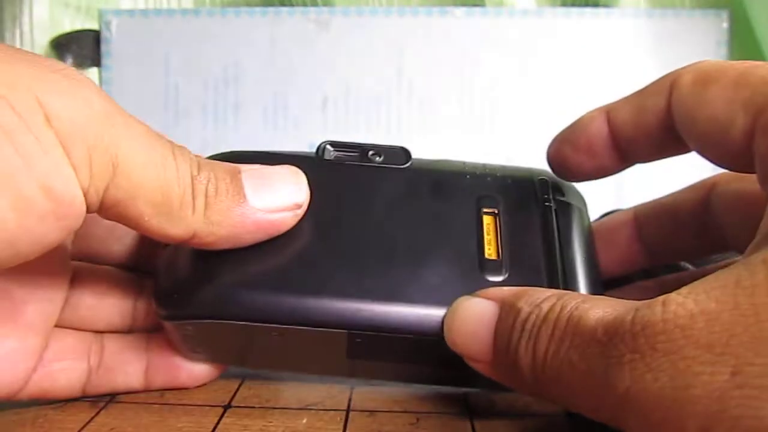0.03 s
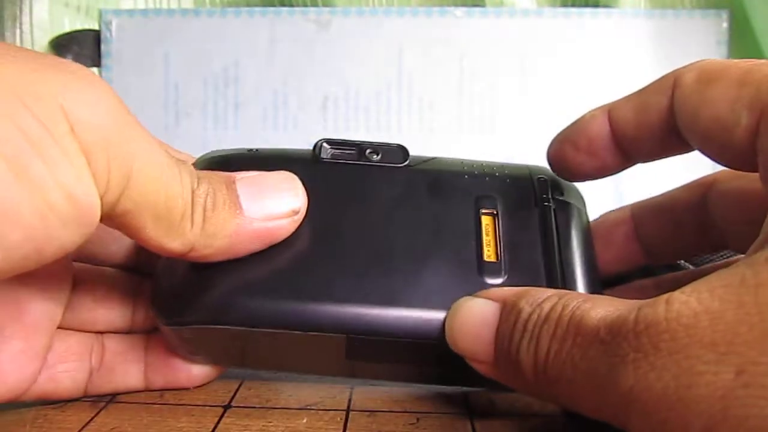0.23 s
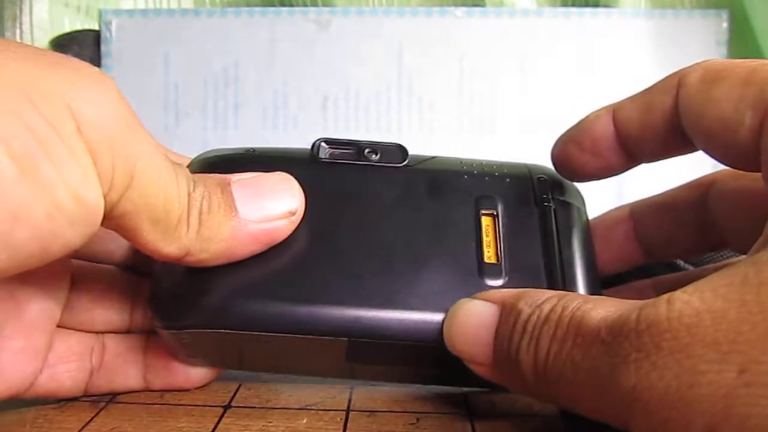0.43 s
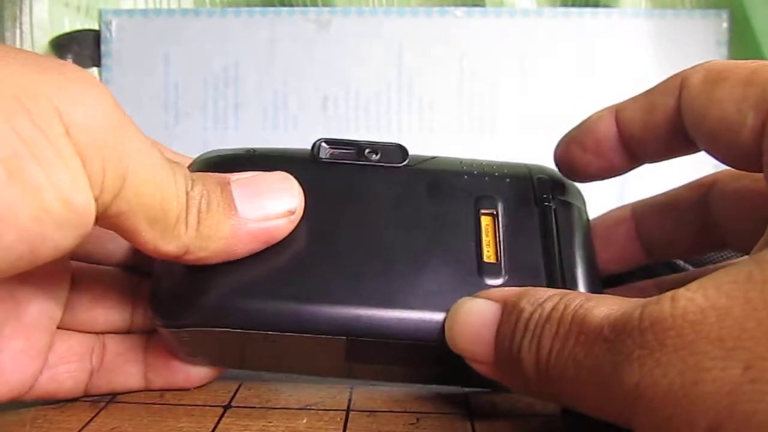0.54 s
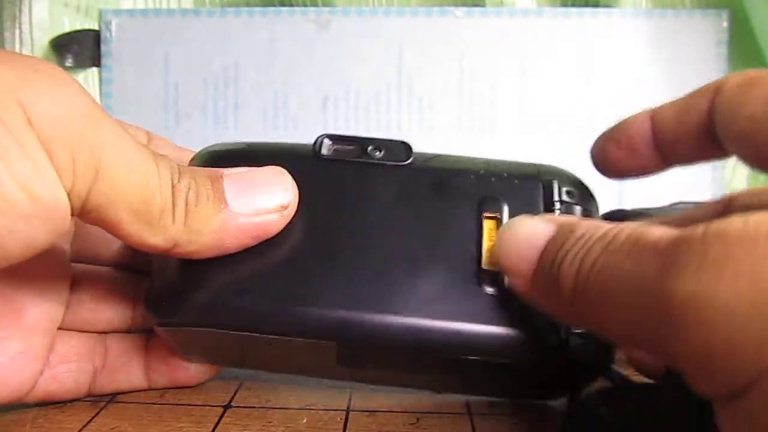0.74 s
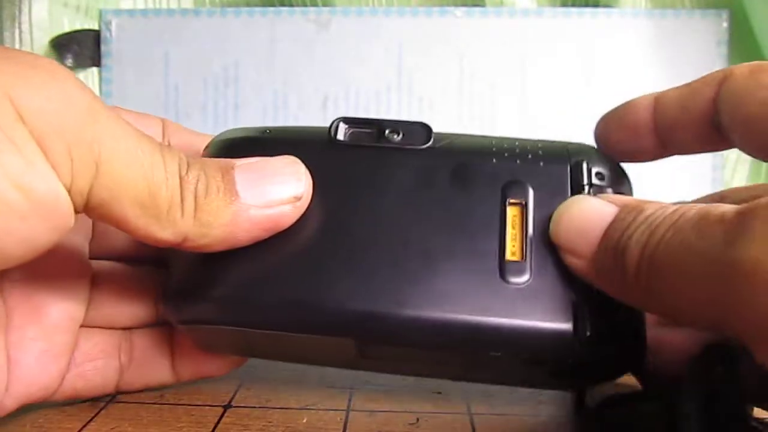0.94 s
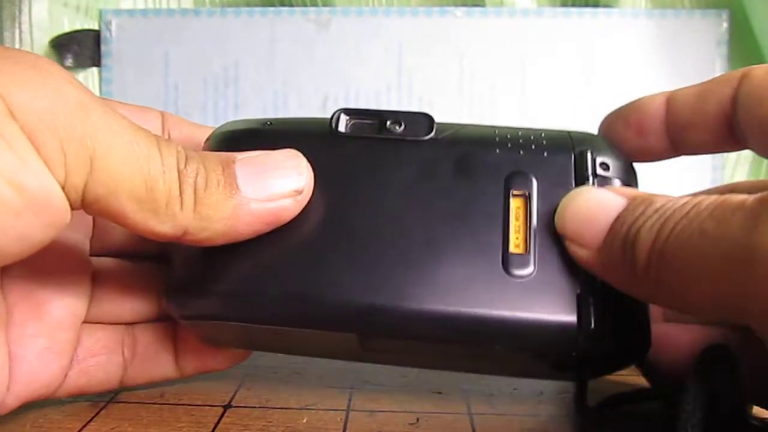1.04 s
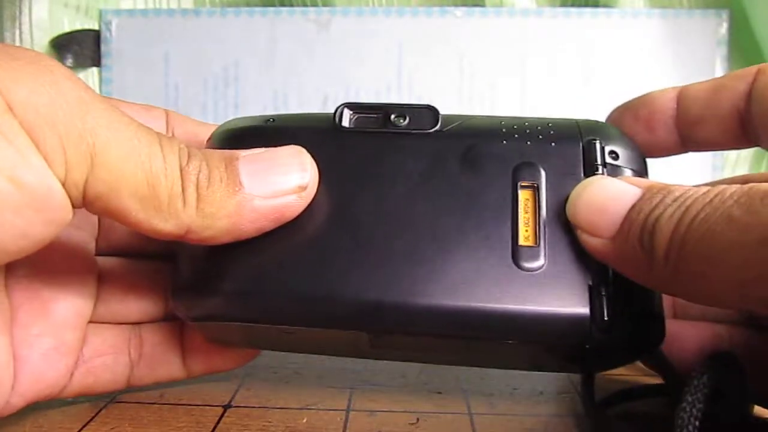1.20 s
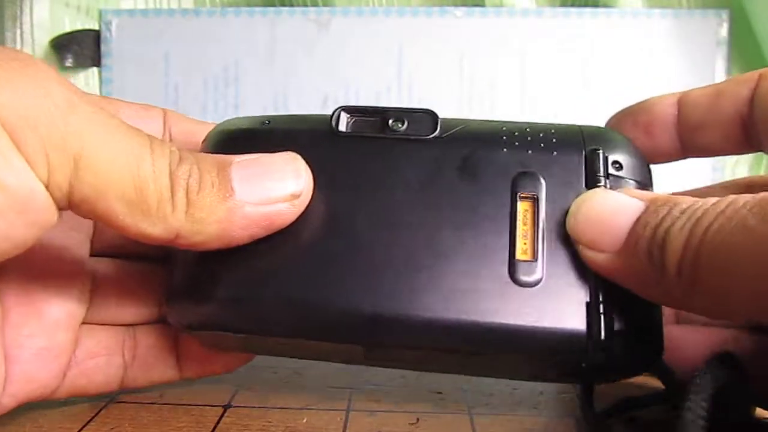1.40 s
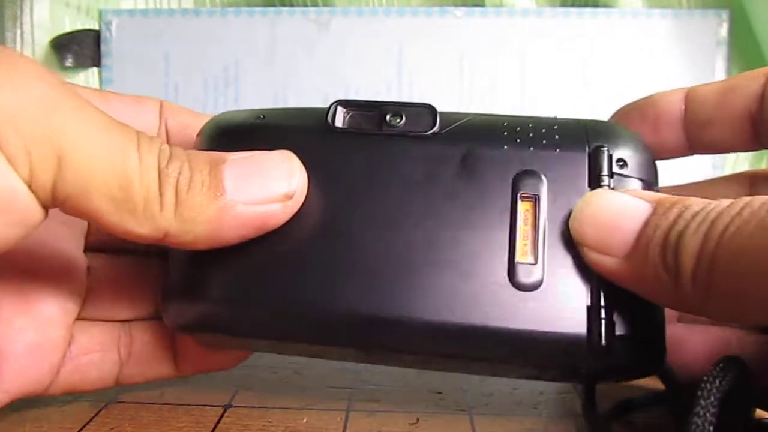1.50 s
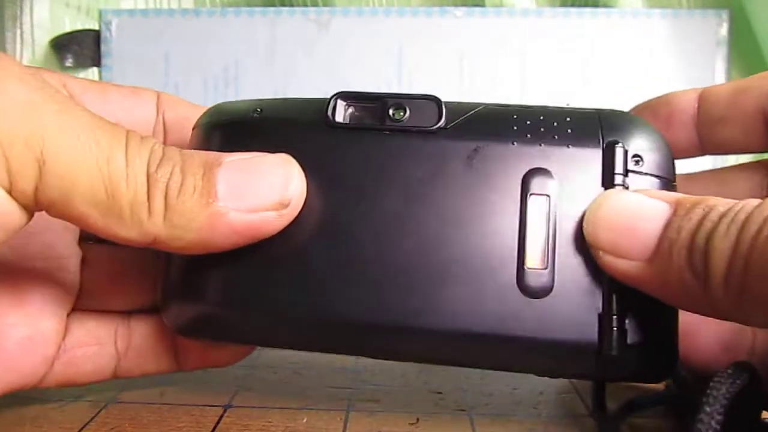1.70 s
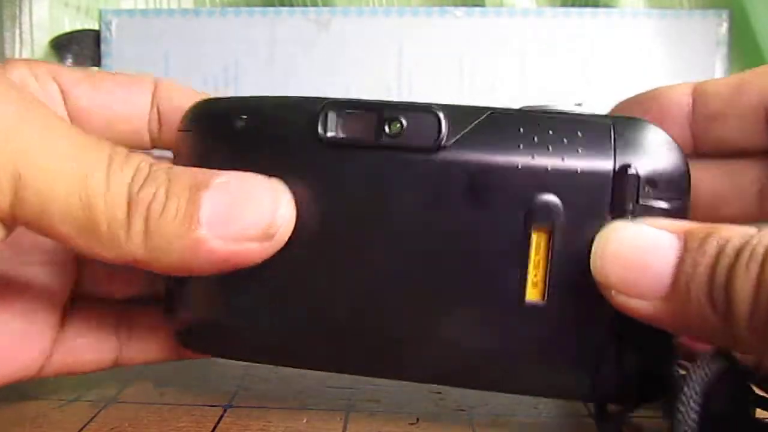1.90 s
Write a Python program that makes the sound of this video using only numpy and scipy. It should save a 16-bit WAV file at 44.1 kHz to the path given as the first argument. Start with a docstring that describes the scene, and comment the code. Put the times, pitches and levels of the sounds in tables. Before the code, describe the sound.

A compact film camera's plastic back ticks faintly, then snaps shut with a loud, sharp click at about 0.2 seconds. Fingers bump the shell softly near 0.4 and 0.7 seconds. From about 0.6 seconds a small motor winds the film, much quieter than the snap, whirring steadily with a high gear whine, hiss and light rattle until about 2 seconds. It is close, in a small room with faint steady noise.

```python
"""A film camera winds on

Close to the microphone, a compact camera's plastic back snaps shut and fingers bump the shell.
A small motor then winds the film: its little gear whines, a slower wheel hums, the brushes hiss
and the gears rattle. The snap makes the recorder turn itself down, and the level creeps back
while the motor runs. A small room adds a short echo and steady noise."""
import sys
import numpy as np
from scipy import signal
from scipy.fft import rfft, irfft, next_fast_len
from scipy.io import wavfile
from scipy.ndimage import uniform_filter1d, map_coordinates

SR = 44100
rng = np.random.default_rng(int(sys.argv[2]) if len(sys.argv) > 2 else 0)


def dump(signal):
    """Clip the signal to [-1, 1] and save it as 16-bit WAV at the path in sys.argv[1]."""
    limited = np.clip(np.atleast_2d(signal).T, -1, 1)
    pcm = np.round(limited * 32767).astype(np.int16)
    wavfile.write(sys.argv[1], SR, pcm)


N = 85995

# tone colour of the room's steady noise (f/Hz, level/dB)
AIR_COLOUR = [(20, -16), (58, -2.5), (85, -3.5), (140, 3.5), (260, 0), (430, 3), (700, -6), (1200, -6.5),
              (2400, -10), (3000, -17), (3900, -29.5), (5500, -22), (8000, -29), (11000, -38), (14000, -50),
              (16000, -84.5)]
# time the room's echo takes to fade by 60 dB (f/Hz, t/s)
ROOM_FADE = [(200, .25), (1200, 0.23), (3000, 0.35), (7000, 0.29), (14000, 0.31)]
# tone colour of that echo (f/Hz, level/dB)
ECHO_COLOUR = [(100, -9), (1100, -0.5), (2400, -4), (4000, -7), (6000, 3.5), (10000, -1), (14000, 3)]
# stereo width of the room and of the close sound: side against middle (f/Hz, level/dB)
ROOM_WIDTH = [(60, -1), (200, 0), (380, -3), (700, -5), (1300, -10), (2400, -11), (4400, -6.5),
              (8000, -2.5), (15000, 3.5)]
NEAR_WIDTH = [(60, 4), (200, -3.5), (400, -12), (700, -15.5), (1300, -20), (2400, -15), (4400, -8),
              (8000, -7), (14000, -1)]

# finger bumps and hits of the latch (t/s, level/dB, treble cutoff f/Hz, hard edge level/dB)
FINGER_BUMPS = [(0.3575, -28, 320, -6.5), (0.732, -19.5, 2200, -24)]
LATCH_HITS = [(0.1254, -32, 1353, -26.5), (0.2006, -23, 1325, -13), (0.2113, -24.5, 1720, -16),
              (0.2129, -14.5, 999, -24.5), (.2138, 9, 8990, -22), (0.2158, -8.5, 12050, -21.5),
              (0.2226, -12.5, 9100, -21.5)]
# ringing notes of the held shell and of the back (f/Hz, level/dB, fade t/s)
SHELL_NOTES = [(160, -15, .07), (350, -2, .048), (530, 0, .022), (810, -4, .02), (1090, -7, .022),
               (1800, -9, .014)]
BACK_NOTES = [(1085, 2, .03), (1510, -6, .035), (1940, -2, .028), (2205, 2, .032), (2560, 4, .028),
              (3250, -6, .026), (4830, -10, .028), (5370, -12, .03), (6110, -10, .035), (6790, -8, .028)]
# tone colour of the latch's crack (f/Hz, level/dB)
CRACK_COLOUR = [(40, -19), (300, -16.5), (750, -11), (1130, -1.5), (1750, -7), (2400, 3), (3700, -8.5),
                (6500, -4.5), (9000, -7.5), (12000, -13), (15000, -25), (18000, -50)]

# turns per second of the motor shaft (t/s, f/Hz)
SHAFT_SPEED = [(.556, 150), (.6, 205), (.72, 213), (.78, 214.2), (.9, 213.7), (1.0, 215.6), (1.11, 213),
               (1.17, 214.1), (1.31, 214.9), (1.36, 213.6), (1.48, 212.9), (1.59, 214.3), (1.67, 213.8),
               (1.87, 213.3), (1.95, 211)]
# teeth meeting as the motor starts (t/s, level/dB)
SLACK_TICKS = [(0.556, -40.5), (.5625, -39), (0.589, -39)]
# tone colours of those ticks, the gears' rumble and their rattle (f/Hz, level/dB)
TICK_COLOUR = [(500, -19), (2400, 6), (4000, -1), (6000, 4), (8000, -2), (12000, -12), (16000, -45.5)]
RUMBLE_COLOUR = [(40, -28), (130, -5.5), (230, 2), (450, -16.5), (750, -1.5), (1500, -9), (2000, -10.5),
                 (4000, -40), (16000, -90)]
RATTLE_COLOUR = [(80, -14), (200, -6), (450, -0.5), (800, -14), (1500, -8.5), (2000, -2.5), (3000, -1.5),
                 (4000, -0.5), (4700, -1), (6200, 1), (7200, -3.5), (8700, -8), (10000, -15), (11500, -21),
                 (14000, -29.5), (16000, -77)]
# loudness of the rumble, the rattle and the brush hiss (t/s, level/dB)
RUMBLE_LEVEL = [(.556, -52), (.8, -50), (1.3, -51), (1.55, -46), (1.75, -41), (1.95, -51.5)]
RATTLE_LEVEL = [(.556, -56.5), (.6, -43.5), (.66, -37.5), (.73, -33.5), (1.0, -34.5), (1.4, -34.5),
                (1.95, -34)]
BRUSH_LEVEL = [(.556, -63), (.6, -37.5), (.74, -35.5), (.85, -32), (.98, -39.5), (1.3, -36.5),
               (1.65, -44.5), (1.95, -50)]
# pitch at which the brushes ring (t/s, f/Hz)
HISS_PITCH = [(.6, 5940), (.75, 5926), (.87, 5534), (1.1, 5395), (1.95, 5536)]
# pitches that the hollow body boosts (f/Hz, width f/Hz, boost level/dB)
BODY_PEAKS = [(1180, 57, 10.5), (2340, 270, 12.5), (6080, 400, 5), (7855, 500, 8), (9520, 330, 6.5)]
# swings in tooth pressure (cycles per turn of the slow wheel, share)
TOOTH_PRESSURE = [(1, 1), (2, .85), (6, .7)]
# the shaft's faint tones (cycles per turn), and each one against the rattle (level/dB)
SHAFT_MULTIPLES = [2, 2.75, 5, 5.25, 9, 10, 12, 14, 16, 17.5, 21, 21.75, 24, 26.25, 28, 28.25]
SHAFT_LEVELS = [-20, -17.5, -17, -19, -24, -20, -24, -17, -19, -24, -15, -19, -21, -14, -17, -18]
# boost of those tones as the film loads the gears (t/s, level/dB)
LOAD_BOOST = [(.8, 0), (1.2, 1.5), (1.9, 2)]
# loudness of the slow wheel's hum, the little gear's whine and its overtones (t/s, level/dB)
HUM_LEVEL = [(.556, -54.5), (1.05, -50), (1.25, -45), (1.49, -40.5), (1.58, -60), (1.66, -60),
             (1.71, -42.5), (1.87, -49.5), (1.93, -58)]
WHINE_LEVEL = [(.556, -73), (.725, -49), (.75, -40), (.88, -36.5), (.95, -44), (1.05, -48), (1.18, -39),
               (1.33, -40), (1.39, -44.5), (1.46, -40), (1.87, -36.5), (1.92, -32.5)]
OVERTONE_LEVEL = [(.556, -78), (.75, -59), (.9, -53), (.98, -38.5), (1.45, -40.5), (1.85, -45.5),
                  (1.92, -40)]

MOTOR_START_S = .556
GEAR_TEETH, WHEEL_TEETH, SHAFT_TURNS_PER_WHEEL_TURN = 11, 11, 4


def amp(db):
    """Turns decibels into a gain."""
    return 10 ** (np.asarray(db) / 20)


def unit(x):
    """Scales a signal to an average power of 1."""
    return x / np.sqrt(np.mean(x ** 2) + 1e-20)


def along(points, hz):
    """Reads a (frequency, value) table at any pitch."""
    f, v = np.transpose(points)
    return np.interp(np.log(hz + 1), np.log(f + 1), v)


def curve(rows):
    """Reads a (time, value) table at every sample."""
    return np.interp(np.arange(N) / SR, *np.transpose(rows))


def wobble(rate):
    """A smooth curve through rate random points a second."""
    return map_coordinates(rng.standard_normal(int(N * rate / SR) + 4), [np.arange(N) * rate / SR])


def filtered(x, response):
    """Gives each frequency in x the gain response(hz)."""
    n = x.shape[-1]
    padded = next_fast_len(n + 8192)
    return irfft(rfft(x, padded) * response(np.fft.rfftfreq(padded, 1 / SR)), padded)[..., :n]


def noise(colour, size=N):
    """Noise with the given tone colour."""
    return unit(filtered(rng.standard_normal(size), lambda hz: amp(along(colour, hz))))


def add(track, start_s, x):
    """Mixes x into the track."""
    i = round(start_s * SR)
    track[i:i + len(x)] += x[:N - i]


def stereo(mid, side, width):
    """Makes left and right from what the ears share (mid) and what differs (side)."""
    share = lambda hz: amp(along(width, hz))
    mid = filtered(mid, lambda hz: 1 / np.hypot(1, share(hz)))
    side = filtered(side, lambda hz: share(hz) / np.hypot(1, share(hz)))
    return np.array([mid + side, mid - side])


def room_noise():
    """The room's steady, low rush."""
    return stereo(noise(AIR_COLOUR), noise(AIR_COLOUR), ROOM_WIDTH)


def room_echo(x):
    """The small room answers with a short tail, different at each ear."""
    hz, t, spectrum = signal.stft(rng.standard_normal((2, SR // 2)), SR, nperseg=256)
    tail_db = along(ECHO_COLOUR, hz)[:, None] - 60 * t / along(ROOM_FADE, hz)[:, None]
    tail = signal.istft(spectrum * amp(tail_db), SR, nperseg=256)[1]
    mid, side = signal.fftconvolve(x[None], tail / np.linalg.norm(tail[0]), axes=1)[:, :N]
    return stereo(mid, side, ROOM_WIDTH)


def stereo_spread(x, delay_s=.001, fade_s=.02):
    """A very short smear makes the close sound differ between the ears, widening it."""
    t = np.arange(SR // 40) / SR
    smear = rng.standard_normal(len(t)) * amp(-60 * t / fade_s) * (t > delay_s)
    return signal.fftconvolve(x, smear / np.linalg.norm(smear))[:N]


def ring(notes, t):
    """Struck plastic rings with fading notes; loose parts make them drift."""
    out = np.zeros(len(t))
    for hz, db, fade_s in notes:
        fade = amp(db + rng.standard_normal() - 60 * t / fade_s)
        drift = np.cumsum(rng.standard_normal(len(t))) * np.sqrt(120 / SR)
        out += fade * np.cos(2 * np.pi * hz * t + drift)
    return out


def opening_level(x):
    """The strength of the first 4 ms of a hit."""
    return np.sqrt(np.mean(x[:SR // 250] ** 2))


def contact(x, db, cutoff_hz, edge_db, edge_hz=8000):
    """A soft contact dulls a hit; a weaker, bright copy adds a hard edge."""
    dull = lambda hz: signal.sosfilt(signal.butter(2, hz, fs=SR, output='sos'), x)
    hit = dull(cutoff_hz) + amp(edge_db) * dull(edge_hz)
    return amp(db) * hit / opening_level(hit)


def fingers(attack_s=.00052, bass_cut_hz=90):
    """Fingers knock softly on the shell, which the hand muffles."""
    out, t = np.zeros(N), np.arange(SR // 6) / SR
    bass_cut = signal.butter(2, bass_cut_hz, 'high', fs=SR, output='sos')
    for start_s, db, cutoff_hz, edge_db in FINGER_BUMPS:
        knock = ring(SHELL_NOTES, t) * (1 - np.exp(-t / attack_s))
        add(out, start_s, contact(signal.sosfilt(bass_cut, knock), db, cutoff_hz, edge_db))
    return out


def crack(t, burst_s=.016):
    """The plastic back shakes for an instant at many frequencies at once."""
    burst = rfft(rng.standard_normal(len(t)) * amp(-60 * t / burst_s))
    flat = burst / np.abs(burst)
    colour = amp(along(CRACK_COLOUR, np.fft.rfftfreq(len(t), 1 / SR)))
    x = irfft(flat * colour, len(t)) * amp(-60 * t / (4 * burst_s))
    return .5 * x / opening_level(x)


def latch(attack_s=.00014, ring_db=-13):
    """The back touches, slides over the catch and snaps home; each hit cracks and rings."""
    out, t = np.zeros(N), np.arange(SR // 6) / SR
    for start_s, db, cutoff_hz, edge_db in LATCH_HITS:
        hit = (crack(t) + amp(ring_db) * ring(BACK_NOTES, t)) * (1 - np.exp(-t / attack_s))
        add(out, start_s, contact(hit, db, cutoff_hz, edge_db))
    return out


def slack_ticks(fade_s=.036):
    """Loose teeth tick together as the gears start to turn."""
    out, t = np.zeros(N), np.arange(SR // 12) / SR
    for start_s, db in SLACK_TICKS:
        add(out, start_s, amp(db - 60 * t / fade_s) * noise(TICK_COLOUR, size=len(t)))
    return out


def chatter(turns, depth_db, grain_db):
    """Tooth pressure shakes the level: a pattern on each turn of the slow wheel, plus chance."""
    wheel_turns = turns / SHAFT_TURNS_PER_WHEEL_TURN
    pattern = sum(share * np.cos(2 * np.pi * k * wheel_turns) for k, share in TOOTH_PRESSURE)
    return unit(amp(depth_db * unit(pattern) + grain_db * wobble(900)))


def gear_rumble(turns):
    """The loaded gears rumble in the shell, swelling as the film tightens."""
    return amp(curve(RUMBLE_LEVEL)) * noise(RUMBLE_COLOUR) * chatter(turns, depth_db=1, grain_db=2.5)


def gear_rattle(turns):
    """Teeth scrape and knock, ringing the hollow body."""
    def response(hz):
        boost_db = sum(db / (1 + (2 * (hz - peak) / width) ** 2) for peak, width, db in BODY_PEAKS)
        return amp(along(RATTLE_COLOUR, hz) + boost_db)
    scrape = rng.standard_normal(N) * chatter(turns, depth_db=.74, grain_db=1.4)
    return amp(curve(RATTLE_LEVEL)) * unit(filtered(scrape, response))


def brushes(turns, rasp_hz=420, settled_hz=210, settled_s=1.15):
    """The motor's sliding contacts rasp; their hiss narrows and sinks as it settles."""
    band = lambda width: unit(filtered(rng.standard_normal((2, N)), lambda hz: 1 / (1 + (hz / width) ** 2)))
    settled = curve([(MOTOR_START_S, 0), (settled_s, 1)]) ** 2
    low = np.sqrt(1 - settled) * band(rasp_hz) + np.sqrt(settled) * band(settled_hz)
    phase = 2 * np.pi * np.cumsum(curve(HISS_PITCH)) / SR
    hiss = unit(low[0] * np.cos(phase) + low[1] * np.sin(phase))  # moves the low noise up in pitch
    return amp(curve(BRUSH_LEVEL)) * hiss * chatter(turns, depth_db=1.7, grain_db=.5)


def wheel_ripple(turns):
    """The off-centre slow wheel makes a ripple that repeats on each of its turns."""
    wheel_turns = turns / SHAFT_TURNS_PER_WHEEL_TURN
    waves = [np.cos(2 * np.pi * (k * wheel_turns + rng.random())) / np.sqrt(k) for k in range(1, 5)]
    return unit(sum(waves))


def tone(turns, per_turn, waver_db, rough, ripple):
    """A wavering tone that follows the shaft, roughened by uneven teeth and the off-centre wheel."""
    phase = 2 * np.pi * (per_turn * turns + rng.random())
    uneven = lambda: rough * wobble(110) + ripple * wheel_ripple(turns)
    level = np.sqrt(2) * amp(waver_db * wobble(13.74))
    return level * ((1 + uneven()) * np.sin(phase) + uneven() * np.cos(phase))


def gear_tones(turns, spool_per_turn=.22, pulse_depth=.34):
    """Teeth meet in rhythm: the little gear whines, the slow wheel hums, the shaft adds faint tones."""
    # the teeth press tighter once per turn of the film spool
    pulse = 1 + pulse_depth * np.cos(2 * np.pi * spool_per_turn * turns)
    whine = pulse * tone(turns, GEAR_TEETH, waver_db=.4, rough=.13, ripple=.06)
    second = amp(-3) * tone(turns, 2 * GEAR_TEETH, waver_db=1.2, rough=.35, ripple=.35)
    third = amp(-3.5) * tone(turns, 3 * GEAR_TEETH, waver_db=1, rough=.3, ripple=.28)
    hum = tone(turns, 2 * WHEEL_TEETH / SHAFT_TURNS_PER_WHEEL_TURN, waver_db=1, rough=.3, ripple=.25)
    shaft = sum(amp(db) * tone(turns, k, waver_db=1.4, rough=.3, ripple=.15)
                for k, db in zip(SHAFT_MULTIPLES, SHAFT_LEVELS))
    return (amp(curve(WHINE_LEVEL)) * whine
            + amp(curve(OVERTONE_LEVEL)) * (second + third)
            + amp(curve(HUM_LEVEL)) * hum
            + amp(curve(RATTLE_LEVEL) + curve(LOAD_BOOST)) * shaft)


def motor():
    """One spinning shaft drives the tones, the rattle, the rumble and the brushes."""
    turns = np.cumsum(curve(SHAFT_SPEED)) / SR
    running = np.arange(N) / SR > MOTOR_START_S
    whirr = gear_tones(turns) + gear_rattle(turns) + gear_rumble(turns) + brushes(turns)
    return running * whirr + slack_ticks()


def scene(echo_db=-16, noise_db=-42):
    """The camera close to the microphone, its echo and the room's steady noise."""
    camera = latch() + fingers() + motor()
    close = stereo(camera, stereo_spread(camera), NEAR_WIDTH)
    return close + amp(echo_db) * room_echo(camera) + amp(noise_db) * room_noise()


def record(dry, threshold_db=-8.5, recovery_db_per_s=3, top_hz=21800):
    """The recorder turns a loud sound down at once and recovers slowly; the snap's peak clips."""
    power = np.abs(uniform_filter1d(np.mean(dry ** 2, axis=0), size=220))
    over_db = np.maximum(10 * np.log10(power + 1e-12) - threshold_db, 0)
    recovery_db = recovery_db_per_s * np.arange(N) / SR
    cut_db = np.maximum.accumulate(over_db + recovery_db) - recovery_db
    clipped = np.clip(dry * amp(-cut_db), -1, 1)
    return filtered(clipped, lambda hz: hz < top_hz)


dry = scene()
out = record(dry)
dump(out)
```